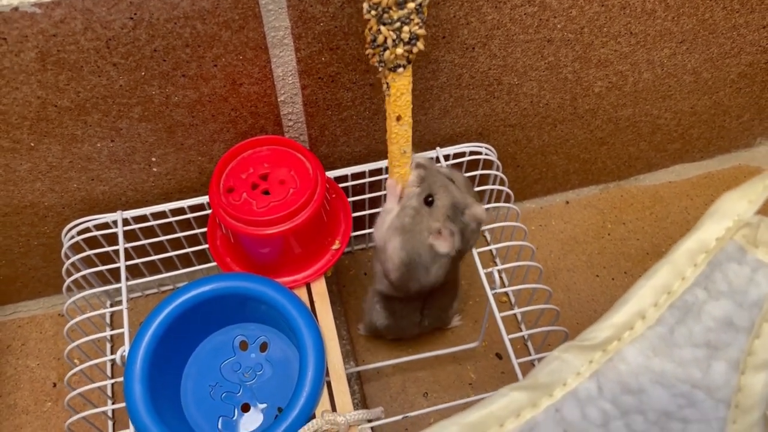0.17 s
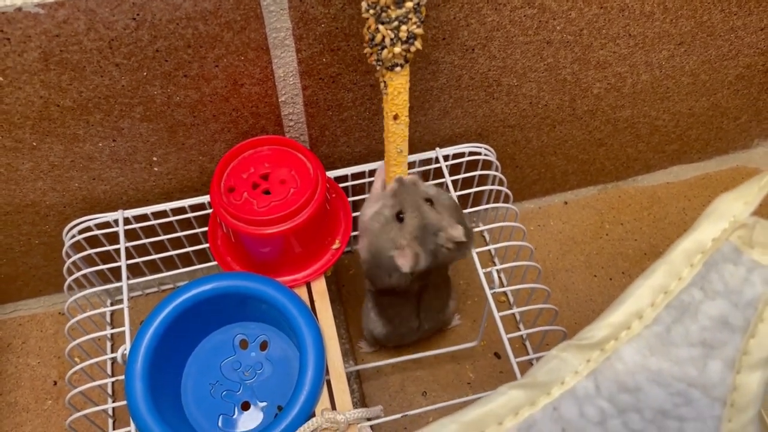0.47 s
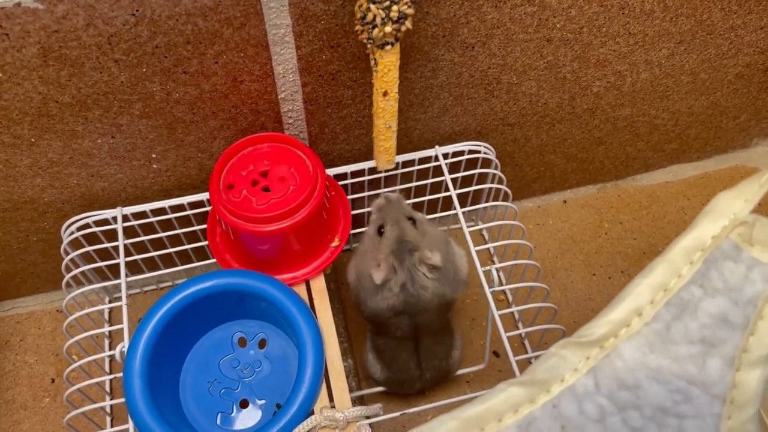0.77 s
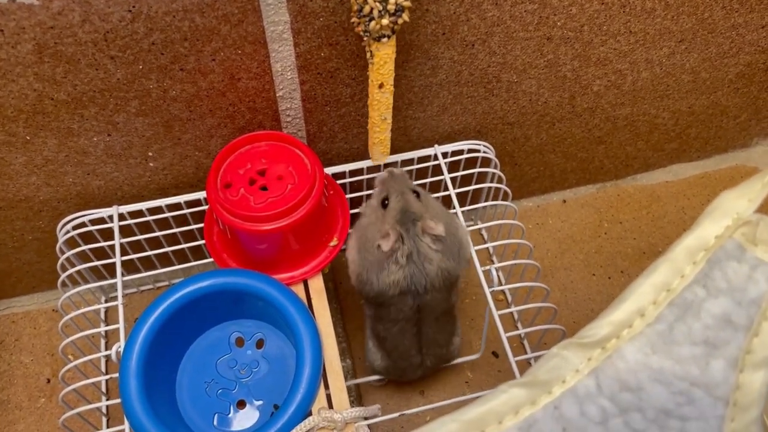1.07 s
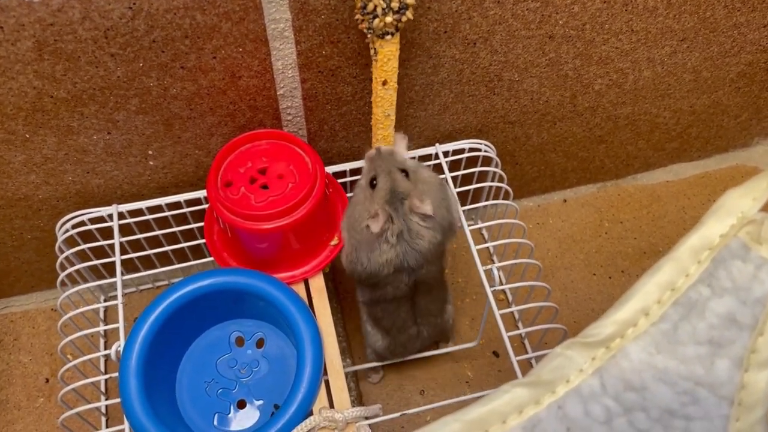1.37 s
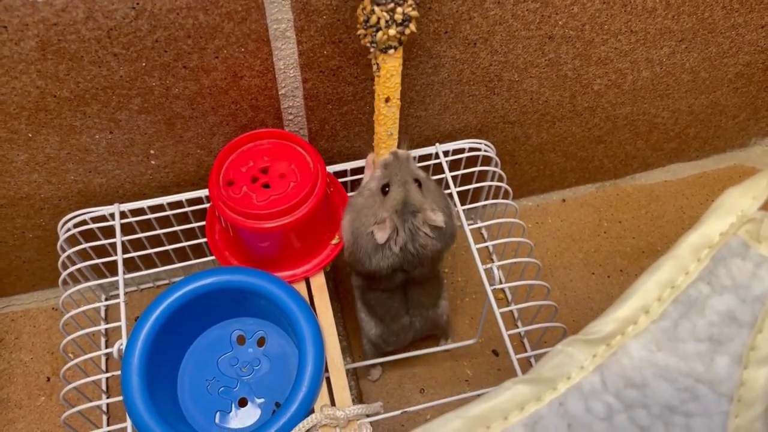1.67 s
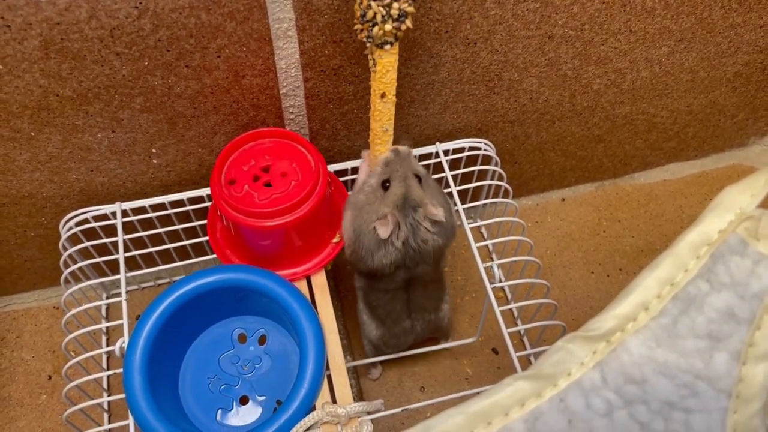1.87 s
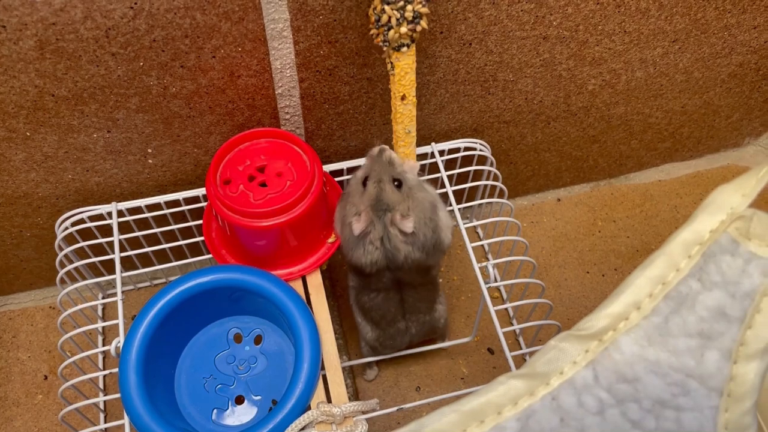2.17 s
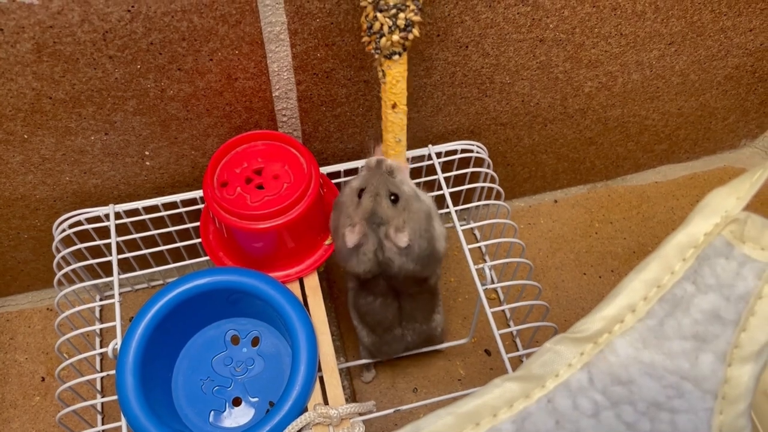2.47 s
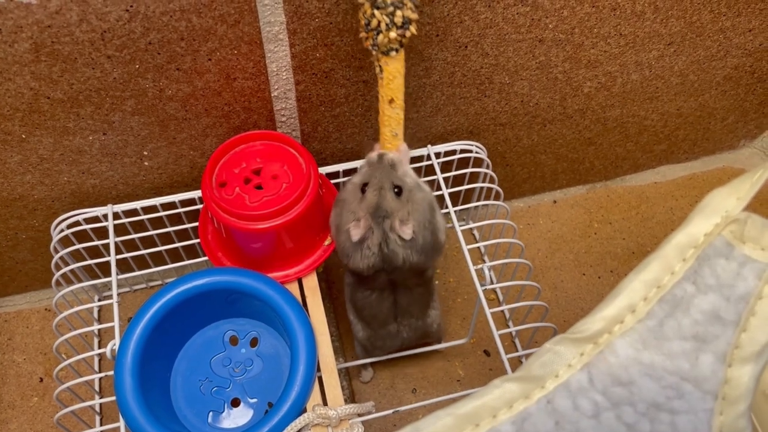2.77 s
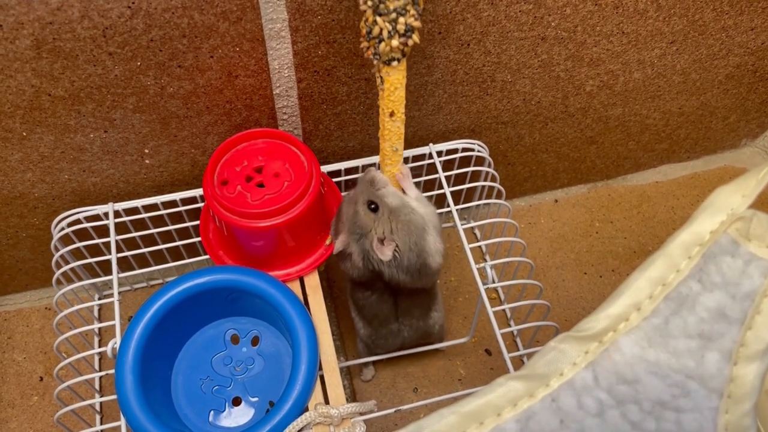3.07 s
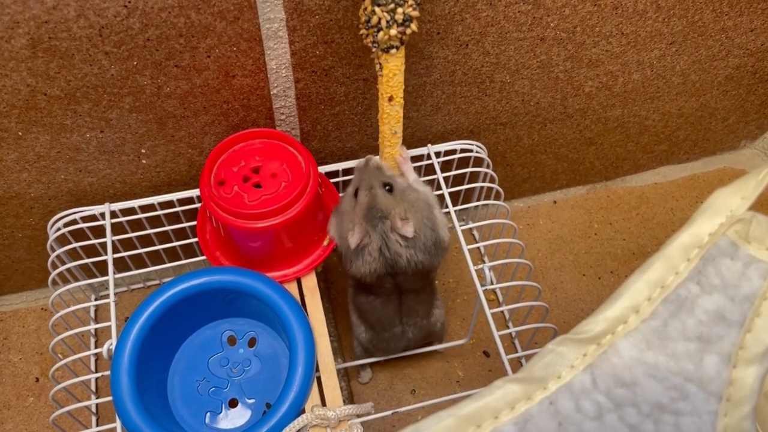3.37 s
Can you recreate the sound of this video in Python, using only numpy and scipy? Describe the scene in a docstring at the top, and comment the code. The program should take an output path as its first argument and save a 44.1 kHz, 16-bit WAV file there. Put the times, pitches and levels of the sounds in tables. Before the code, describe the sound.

A hamster gnaws a hard seed stick in dry scraping bursts with crisp snaps over faint traffic

```python
"""A hamster gnaws a hard seed stick hanging in a cardboard pen, close to a phone held above.
Its incisors scrape in short bites (noise grains through the stick's resonances) and chip off crumbs
that snap; a tooth taps the hollow end with a short ring and the stick knocks the cardboard.
Beyond, traffic is shaped noise that stirs the room's low resonances, with narrow street hums;
two engine notes climb far away and a faint whine rises, both as wavering sines."""
import sys
import numpy as np
from scipy import signal
from scipy.fft import rfft, irfft
from scipy.io import wavfile
from scipy.ndimage import uniform_filter1d

SR = 44100
rng = np.random.default_rng(int(sys.argv[2]) if len(sys.argv) > 2 else 0)


def gain_from_db(level_db):
    """Convert decibel levels to linear amplitude factors (20 dB per decade)."""
    decades = np.asarray(level_db, float) / 20
    return 10 ** decades


def file_out(sig):
    """Save sig as 16-bit WAV at sys.argv[1]."""
    # one column per channel
    cols = np.atleast_2d(sig).T
    # limit, then scale
    lim = np.clip(cols, -1, 1)
    pcm = np.round(lim * 32767).astype(np.int16)
    wavfile.write(sys.argv[1], SR, pcm)


N = 155232  # samples


def at_hz(points, hz):
    """Read a spectrum table at the given frequencies, straight lines over log frequency."""
    table_hz, values = np.transpose(points)
    return np.interp(np.log(hz), np.log(table_hz), values)


def in_time(rows):
    """Columns of a time table, sample by sample."""
    s, *columns = np.transpose(rows)
    return [np.interp(np.arange(N) / SR, s, column) for column in columns]


def rms_one(x):
    """Scale to rms 1."""
    return x / np.sqrt(np.mean(x ** 2) + 1e-20)


def resonance(x, hz, width_hz):
    """Two-pole resonance with a peak gain of 1."""
    r = np.exp(-np.pi * width_hz / SR)
    gain = (1 - r * r) / 2
    poles = [1, -2 * r * np.cos(2 * np.pi * hz / SR), r * r]
    return signal.lfilter([gain, 0, -gain], poles, x + 1e-18)


def drift(rate_hz):
    """Slow random wandering of rms 1: noise through two equal low-pass poles."""
    r = np.exp(-2 * np.pi * rate_hz / SR)
    noise = rng.standard_normal(N + SR)
    return rms_one(signal.lfilter([1], [1, -2 * r, r * r], noise)[SR:])  # first second settles


def coloured(spectrum, channels):
    """Noise with the given spectrum, as frequencies and a one-sided transform."""
    hz = np.maximum(np.fft.rfftfreq(N, 1 / SR), 1)
    return hz, rfft(rng.standard_normal((channels, N))) * gain_from_db(at_hz(spectrum, hz))


def narrow(hz, width_hz, swell):
    """Noise twice through one resonance, its chance beats partly evened, under a swell."""
    noise = rng.standard_normal(N + SR)
    tone = rms_one(resonance(resonance(noise, hz, width_hz), hz, width_hz)[SR:])
    local_rms = np.sqrt(uniform_filter1d(tone * tone, size=4000))
    level_db, = in_time(swell)
    return rms_one(tone / (1 + local_rms)) * gain_from_db(level_db)


def note(rows, pitch_waver_hz, waver_db):
    """A gliding sine that wavers in pitch and level and fades outside its table."""
    hz, db = in_time(rows)
    t = np.arange(N) / SR
    outside_s = np.maximum(np.maximum(rows[0][0] - t, t - rows[-1][0]), 0)
    fade = np.exp(-outside_s / 0.081)
    wavering_hz = hz + pitch_waver_hz * drift(21.0)
    phase = 2 * np.pi * np.cumsum(wavering_hz) / SR + rng.uniform(0, 4.1)
    return np.sqrt(2) * np.sin(phase) * gain_from_db(db + waver_db * drift(27.0)) * fade


def rumble():
    """Steady low noise of the traffic, shaped by its spectrum."""
    # Each row: frequency in Hz, relative density in dB per Hz.
    spectrum = [(30, -65.5), (45, 24), (110, 15.5), (200, -31.5), (400, -54)]
    transform = coloured(spectrum, channels=1)[1][0]
    return gain_from_db(-47) * rms_one(irfft(transform, N))


def booms():
    """Low resonances of the room stirred by traffic, each swelling on its own."""
    # Each row: pitch in Hz, width of the resonance in Hz.
    room = [(45, 8), (82, 9.5), (131, 6)]
    # Swells of the lowest, middle and highest boom. Each row: time in seconds, level in dB.
    low = [(0, -33), (.3, -66), (1.25, -50), (1.6, -42.5), (1.949, -52.5), (3.102, -42), (3.52, -64)]
    mid = [(0, -38), (.4, -43.5), (0.951, -46), (1.15, -38), (1.45, -42.5), (1.801, -34), (2.1, -48.5),
           (3.1, -41), (3.52, -54.5)]
    high = [(0, -51), (.54, -57.5), (.66, -45.5), (1.02, -60), (1.1, -40.5), (1.261, -64.5), (1.35, -41.5),
            (1.9, -61.5), (2.069, -44.5), (2.42, -50.5), (2.512, -45.5), (3.029, -38.5), (3.1, -61)]
    return sum(narrow(hz, width, swell) for (hz, width), swell in zip(room, (low, mid, high)))


def wash():
    """Diffuse wash of passing traffic: noise only partly alike on both sides, swelling with its level."""
    # Spectrum of the wash. Each row: frequency in Hz, relative density in dB per Hz.
    spectrum = [(205, 3), (260, -4.5), (400, -8.5), (760, -10), (960, -8.5), (1200, -14), (2500, -23.5),
                (3300, -34.5), (4300, -39.5), (7200, -44.5), (9500, -49.5), (13500, -55.5), (16500, -80)]
    # Likeness of left and right. Each row: frequency in Hz, correlation from -1 to 1.
    likeness = [(185, 1), (260, -0.08), (600, 0.28), (2000, -0.032), (8000, 0.85)]
    # Swell of the passing traffic. Each row: time in seconds, level in dB ahead of the lift below.
    swell = [(0, -62.5), (.5, -61), (.95, -61), (1.3, -60), (1.7, -62.5), (2.3, -64.5), (2.9, -63),
             (3.52, -63)]
    lift_db, right_over_left_db = 6.5, 0.5
    treble_band_hz, treble_follows = (1750, 4940), 0.95  # this band swings further with the level

    hz, (mid, side) = coloured(spectrum, channels=2)
    alike = np.clip(at_hz(likeness, hz), -1, 1)
    low_cut = hz ** 4 / (hz ** 4 + 127.3 ** 4)
    common = np.sqrt(1 + alike) * mid
    opposed = np.sqrt(1 - alike) * side * [[1], [-1]]
    noise = irfft(low_cut * (common + opposed), N)

    level_db, = in_time(swell)
    band = signal.butter(1, treble_band_hz, "band", fs=SR, output="sos")
    treble = signal.sosfilt(band, noise)
    noise = noise + treble * (gain_from_db(treble_follows * (level_db - level_db.mean())) - 1)
    noise *= gain_from_db([[-right_over_left_db / 2], [right_over_left_db / 2]])
    return rms_one(noise) * gain_from_db(lift_db + level_db + 1.06 * drift(12.0))


def hums():
    """Two narrow tones of the street, made of resonant noise."""
    # Swells of the lower and higher hum. Each row: time in seconds, level in dB ahead of the 7 dB cut.
    low = [(0, -65.5), (.35, -58.5), (0.899, -68.5), (1.35, -59), (1.901, -65)]
    high = [(0, -63), (.9, -62), (1, -53.5), (1.42, -56), (1.55, -61.5), (2.05, -63.5), (2.75, -64.5),
            (2.82, -60.5), (3.52, -62.5)]
    width_hz = 17.4
    return gain_from_db(-7.0) * (narrow(354.1, width_hz, low) + narrow(609.1, width_hz, high))


def whine():
    """A far, faint whine that rises: a sine wandering in pitch and level."""
    # Each row: time in seconds, pitch in Hz, level in dB.
    glide = [(0, 900, -69.5), (.68, 890, -62.5), (1.05, 962, -65), (1.3, 992, -67.5), (1.48, 1020, -71)]
    return note(glide, pitch_waver_hz=18, waver_db=2.5)


def stick(force, tilt_db, shift_db=0):
    """Force on the stick through its resonances, tilted in dB per octave about 8 kHz.
    With shift_db, each resonance waxes and wanes as the grip shifts."""
    # Resonances of teeth and stick. Each row: pitch in Hz, width in Hz, relative level in dB.
    modes = [(3100, 660, -14), (4640, 360, -13), (5360, 1200, -15), (6840, 510, -4.5), (7620, 450, -6),
             (9070, 600, -1), (10680, 1200, -6), (11700, 980, -7), (14000, 3300, -8.5)]
    total = 0
    for k, (hz, width, db) in enumerate(modes):
        drive_db = tilt_db * np.log2(max(hz, 5000) / 8000)  # no further tilt below 5 kHz
        if shift_db:
            drive_db = drive_db + shift_db * drift(28.0)
        total = total + (-1) ** k * gain_from_db(db) * resonance(force * gain_from_db(drive_db), hz, width)
    return total


def gnawing():
    """Dense uneven grains under each bite's pressure, through the stick."""
    # Bites, each a swell of tooth pressure. Each row: peak in seconds, level in dB, rise in ms,
    # fall in ms, brightness in dB per octave.
    bites = [(0.1565, -71, 3.8, 40, -19), (0.168, -57.5, 12, 2.9, -2), (0.254, -67, 22, 26, -3),
             (0.3308, -83, 4.8, 83, -18), (0.409, -72.5, 3.3, 14, 6), (0.529, -61.5, 3.5, 6.4, -8),
             (0.633, -70.5, 6, 8, -14), (0.855, -79, 12, 12, -27), (1.161, -74, 2.3, 8.2, 3),
             (1.3952, -64.5, 25, 25, -10), (1.432, -60.5, 7.5, 4.5, -10), (1.439, -73.5, 1.3, 6.9, -37),
             (1.482, -80, 15.4, 62, -21), (1.5515, -64, 14, 11.5, -5), (1.59, -60.5, 7.6, 4.8, -10.5),
             (1.5995, -64, 1, 11, -14), (1.659, -71, 5.9, 5, -15), (1.7237, -61, 0.62, 22, -8.5),
             (1.734, -58.5, 5.8, 5, -8), (1.8507, -67.5, 7, 3.4, -2), (1.906, -68.5, 17, 14, -8),
             (1.9393, -75.5, 3.5, 32, -10), (2.0272, -57.5, 3.9, 3.6, -12), (2.07, -78, 24, 110, -14),
             (2.109, -67, 11, 8.7, -7), (2.118, -59, 1, 8, -17), (2.299, -58, 0.79, 7.8, -20.5),
             (2.3273, -70, 1.7, 18, -12), (2.4306, -65.5, 1.9, 7.8, -15.5), (2.4856, -69.5, 3.7, 5.4, 0),
             (2.5232, -75.5, 14, 2.5, -14), (2.5366, -56.5, 2.4, 6.5, -7.5), (2.5566, -59.5, 4.3, 2.8, -2),
             (2.618, -68.5, 8, 12, 2.5), (2.6482, -57.5, 12, 15.3, -6), (2.7148, -56.5, 8.3, 3.1, -6),
             (2.777, -73, 44, 22, -5.5), (3.068, -61.5, 2.5, 15, -8.5), (3.1279, -72.5, 8.3, 13, -7),
             (3.2085, -65.5, 22, 10, -7), (3.2484, -75, 12, 18, -7)]
    grains_per_s, grain_spread_db, side_share = 7000, 2.5, 0.45
    t = np.arange(N) / SR
    level, tilt = np.full(N, 1e-9), np.zeros(N)
    for s, db, rise, fall, bright in bites:
        near = slice(max(int((s - .2) * SR), 0), int((s + .4) * SR))
        ms = (t[near] - s) * 1000
        pressure = gain_from_db(db) * np.exp(-np.where(ms < 0, (ms / rise) ** 2, ms / fall))
        level[near] += pressure
        tilt[near] += bright * pressure  # overlapping bites blend by pressure

    strikes = rng.random((2, N)) < grains_per_s / SR
    unevenness_db = grain_spread_db * np.minimum(rng.exponential(1, (2, N)), 4)
    grains = strikes * rng.standard_normal((2, N)) * gain_from_db(unevenness_db)
    force = grains * level / np.std(stick(grains[0], 0))
    mid, side = stick(force, tilt / level, shift_db=2.2)
    return mid + side_share * side * np.array([[1], [-1]])


def chips():
    """Each crumb snaps with a pitch of its own, then crumbles away through the stick."""
    # Crumbs that crack off. Each row: start in seconds, peak of the snap in dB, pitch in Hz.
    crumbs = [(0.1706, -48, 9300), (.2451, -51, 10300), (0.5265, -53, 11300), (1.4287, -48.5, 8600),
              (1.4375, -44, 9100), (1.551, -48, 7100), (1.5902, -43, 8500), (1.801, -51.5, 6900),
              (1.862, -57, 9000), (2.024, -44, 10800), (2.026, -52, 11100), (2.1165, -39.5, 9500),
              (2.2973, -39, 11900), (2.297, -59.5, 9000), (2.3022, -62, 9500), (2.3055, -47, 11900),
              (2.3284, -49, 11200), (2.4272, -44.5, 12500), (2.5185, -51, 10900), (2.535, -53, 7850),
              (2.5566, -52.5, 7900), (2.6028, -48.5, 9250), (2.6112, -52, 11000), (2.707, -37.5, 12730),
              (2.7154, -52, 6980), (3.0642, -45, 10700), (3.068, -44.5, 9300), (3.0753, -48, 9800)]
    width_hz, tail_db, tail_s = 3000, -14, .002  # tail level is relative to the snap
    t = np.arange(400) / SR
    snaps, force = np.zeros(N), np.zeros(N)
    for s, db, hz in crumbs:
        at = slice(int(s * SR), int(s * SR) + len(t))
        snap = resonance(resonance(t == 0, hz, width_hz), hz, width_hz)
        snaps[at] += gain_from_db(db) * snap / np.abs(snap).max()
        grit = rng.standard_normal(len(t))
        force[at] += gain_from_db(db + tail_db) * grit * np.exp(-t / tail_s)
    stick_gain = np.std(stick(rng.standard_normal(SR), 0))
    return snaps + stick(force, 0, shift_db=2.2) / stick_gain


def taps():
    """A tooth taps the stick's hollow end: a short woody ring, a decaying sine."""
    # Each row: start in seconds, peak in dB, pitch in Hz.
    rings = [(0.245, -61, 3340), (0.528, -60.5, 3360), (1.808, -63.5, 2630)]
    width_hz = 50  # sets how fast the ring dies
    total = np.zeros(N)
    for s, db, hz in rings:
        after = np.arange(N) / SR - s
        decay = (after > 0) * np.exp(-np.pi * width_hz * np.maximum(after, 0))
        total += gain_from_db(db) * decay * np.sin(2 * np.pi * hz * after)
    return total


def engine():
    """An engine speeds up far away: two climbing, wavering notes."""
    # Lower and higher note. Each row: time in seconds, pitch in Hz, level in dB.
    low = [(2.2, 52, -46), (2.8, 56.7, -50.5), (3.1, 61.1, -38.5), (3.52, 69.5, -37)]
    high = [(2.1, 94, -44.5), (2.5, 101, -51.5), (2.9, 108, -43), (3.52, 117, -45.5)]
    return note(low, 0.9, waver_db=1.5) + note(high, 1.0, waver_db=1.5)


def cardboard(x):
    """The cardboard wall's resonances, side by side with alternating sign."""
    # Each row: pitch in Hz, width in Hz, relative level in dB.
    modes = [(1050, 300, 5.5), (1820, 530, -13.5), (1347, 18, 10.5), (2340, 350, -1), (3070, 430, -2.5)]
    return sum((-1) ** k * gain_from_db(db) * resonance(x, hz, width) for k, (hz, width, db) in enumerate(modes))


def knocks():
    """The stick rubs and knocks the wall: short crunches of noise into the cardboard's resonances."""
    # Each row: start in seconds, level in dB, fall in ms.
    blows = [(2.499, -54.5, 26), (2.515, -71, 15), (2.771, -65, 25), (2.934, -60, 23)]
    t = np.arange(N) / SR
    shape = sum(gain_from_db(db) * (t > s) * np.exp(-np.maximum(t - s, 0) * 1000 / fall) for s, db, fall in blows)
    low_pass = signal.butter(2, 4000, fs=SR, output="sos")
    noise = signal.sosfilt(low_pass, rng.standard_normal(N))
    return cardboard(noise * shape) / np.std(cardboard(noise))


def pen(x):
    """Short dry reflections off the cardboard walls: decaying noise, different on each side."""
    level_db, t60_s = -9, .045
    t = np.arange(int(.2 * SR)) / SR
    tail = rng.standard_normal((2, len(t))) * gain_from_db(-60 * t / t60_s) * (t > .001)
    tail /= np.sqrt((tail ** 2).sum(axis=1, keepdims=True))
    return gain_from_db(level_db) * signal.fftconvolve(x, tail, axes=1)[:, :N]


def scene():
    """Hamster near with the pen's reflections, street far."""
    bass = (rumble() + booms() + engine()) * gain_from_db([[-1], [1]])  # same wave, left 2 dB below right
    tones = hums() + whine()
    street = wash() + [tones, np.roll(tones, 6)]  # tones reach the right side 6 samples later
    near = gnawing() + chips() + taps() + knocks()
    return near + pen(near) + bass + street


def top_cut(x):
    """Nothing passes above the cut-off."""
    return signal.sosfilt(signal.butter(12, 16510, fs=SR, output="sos"), x)


def record(dry):
    """The phone's microphone loses the deepest bass, below about 29 Hz."""
    bass_cut = signal.butter(4, 29.3, "high", fs=SR, output="sos")
    return top_cut(signal.sosfilt(bass_cut, dry))


dry = scene()
out = record(dry)
file_out(out)
```